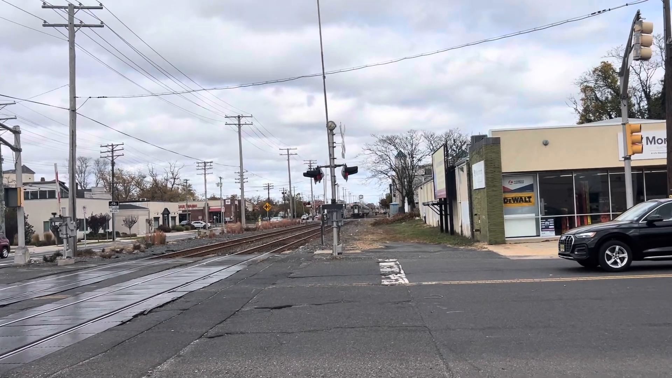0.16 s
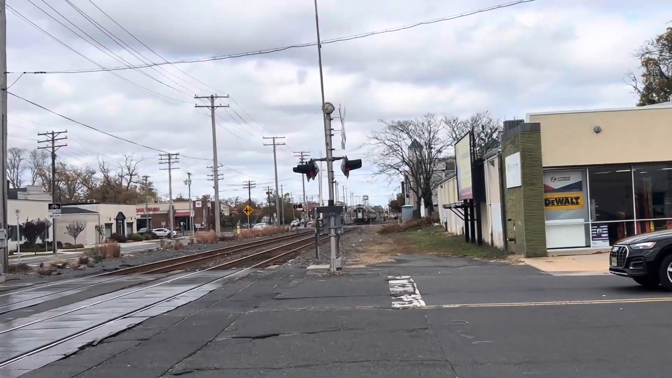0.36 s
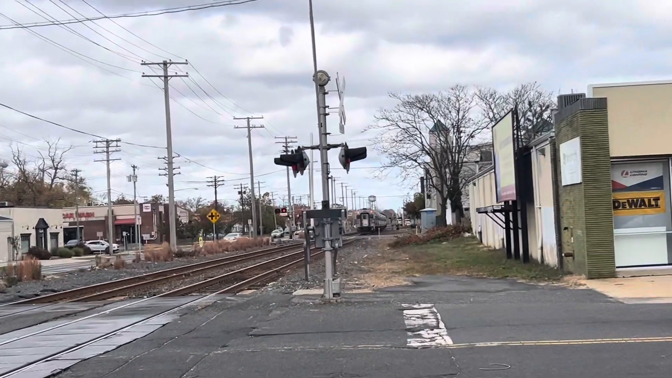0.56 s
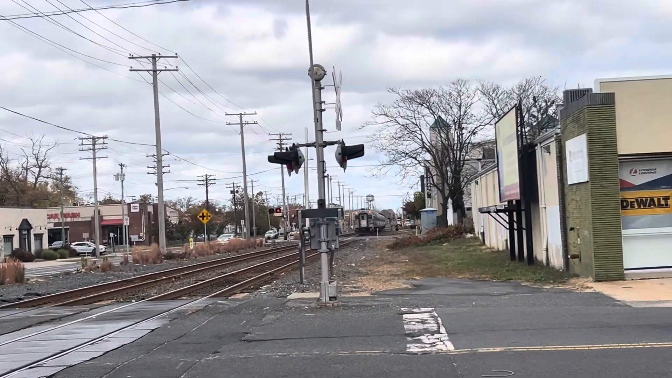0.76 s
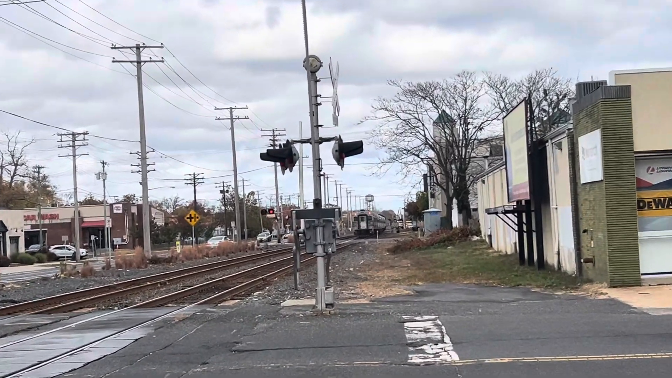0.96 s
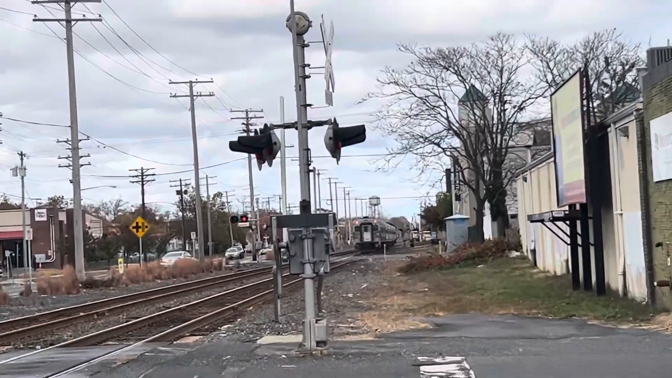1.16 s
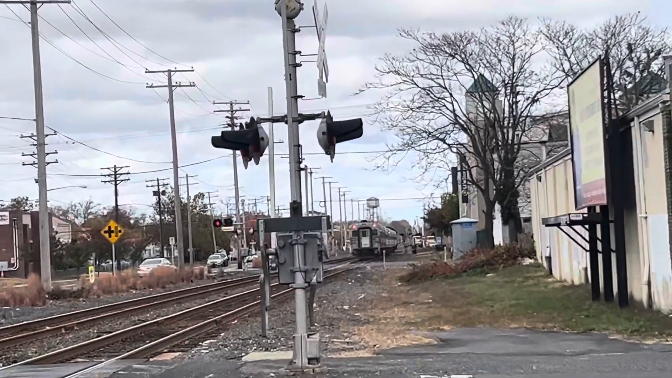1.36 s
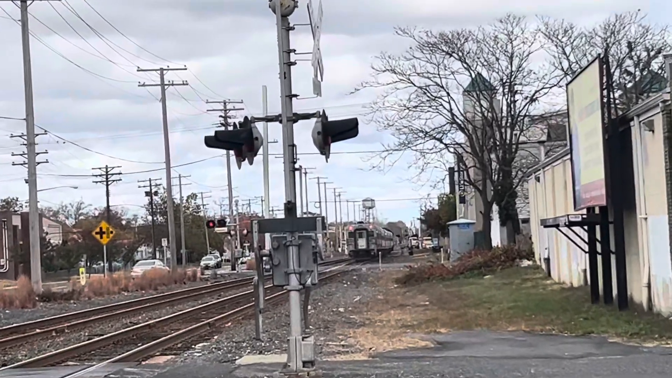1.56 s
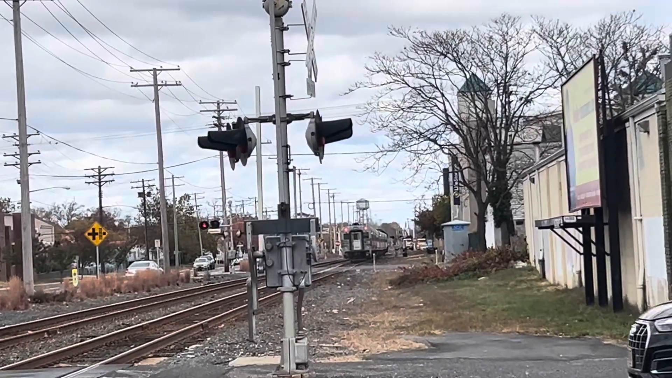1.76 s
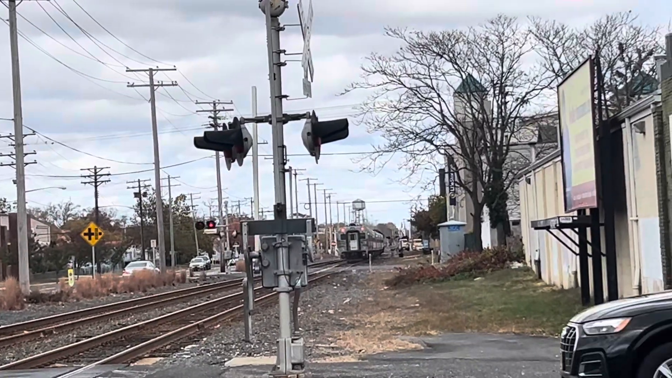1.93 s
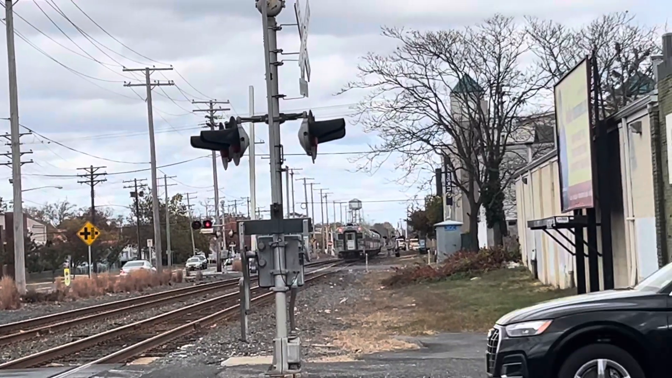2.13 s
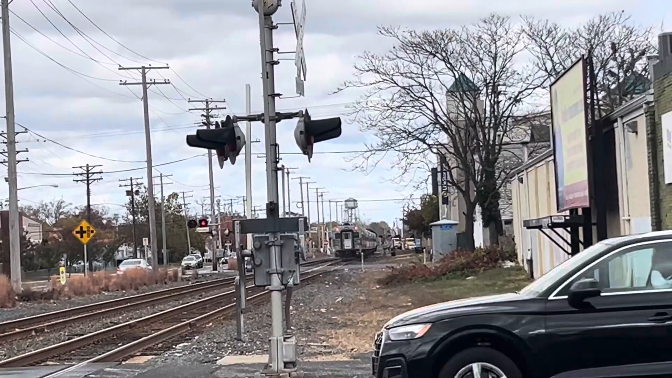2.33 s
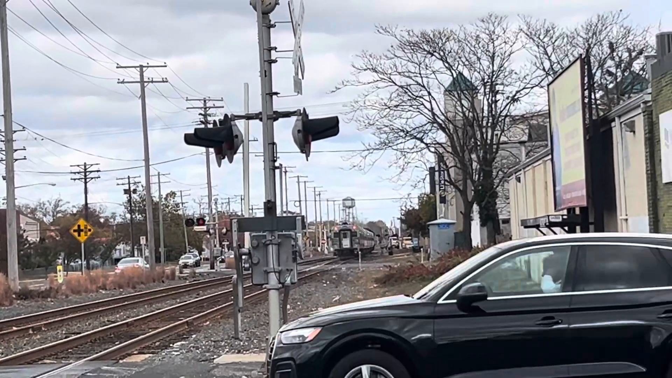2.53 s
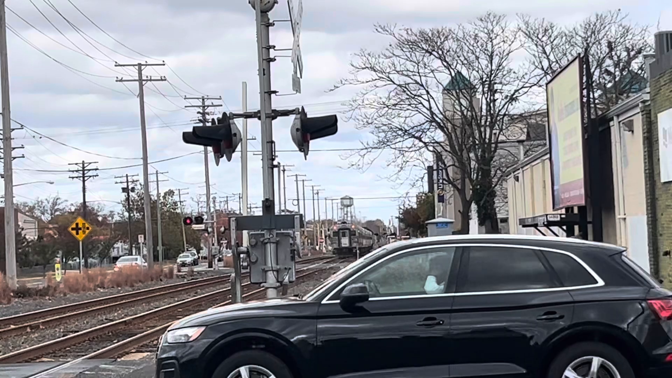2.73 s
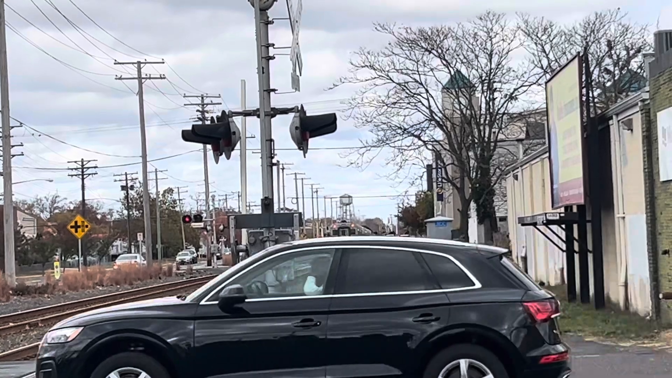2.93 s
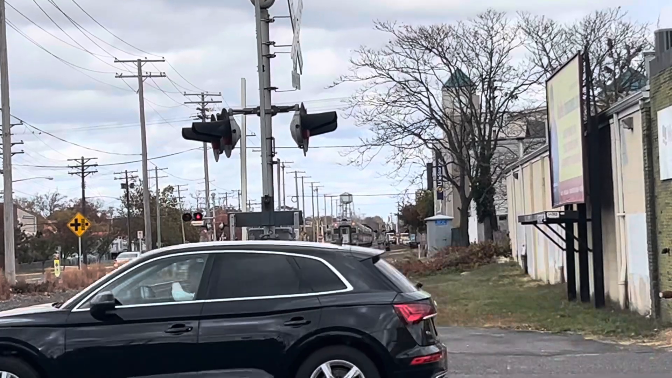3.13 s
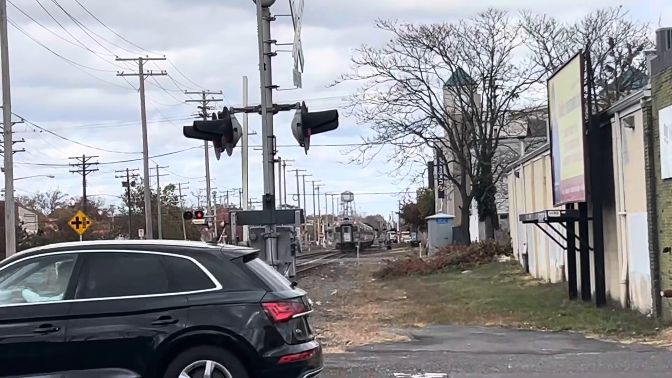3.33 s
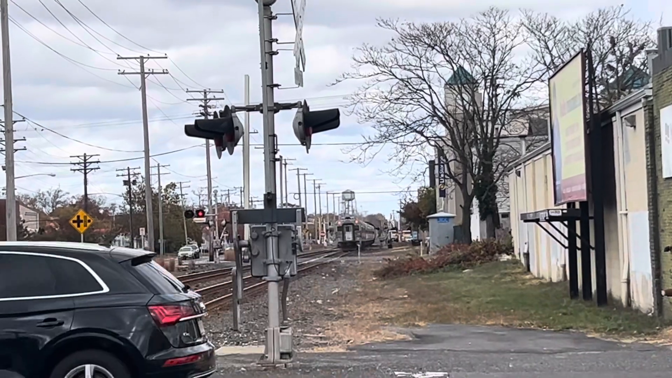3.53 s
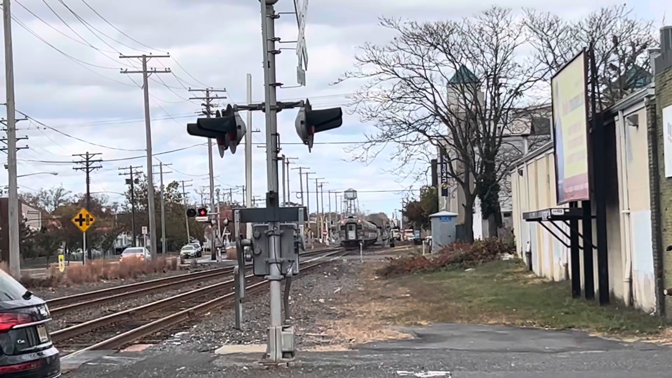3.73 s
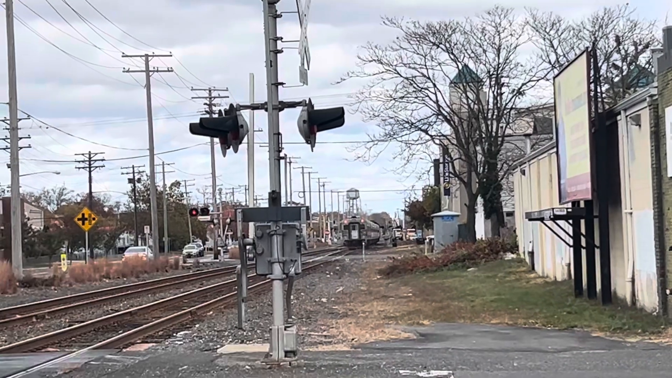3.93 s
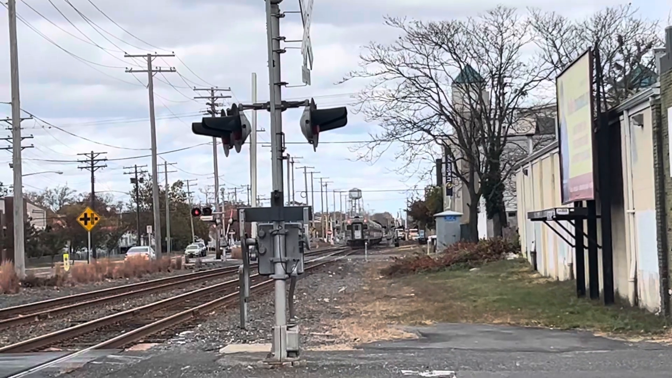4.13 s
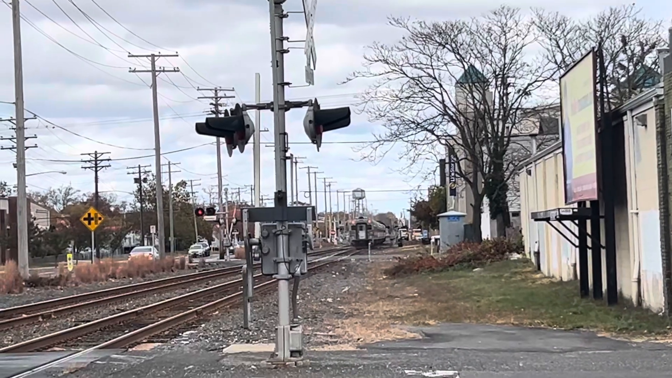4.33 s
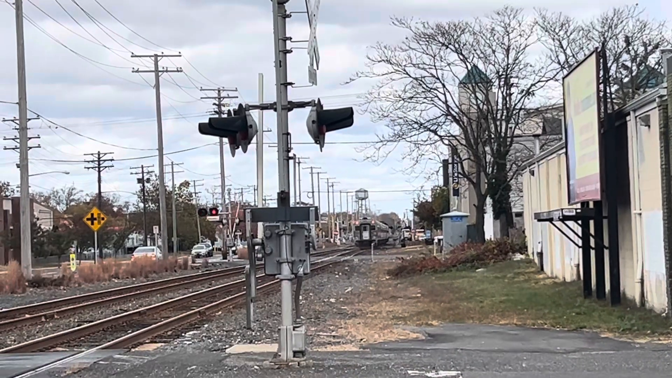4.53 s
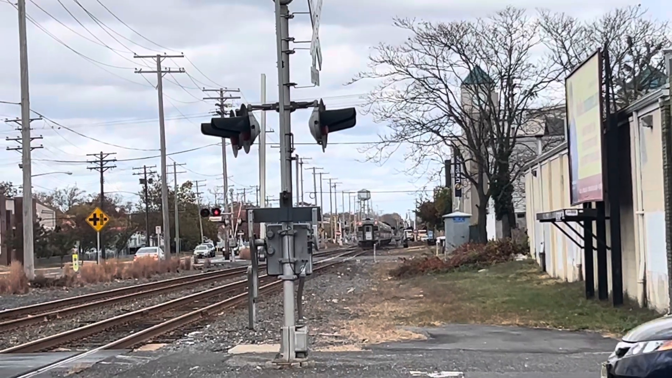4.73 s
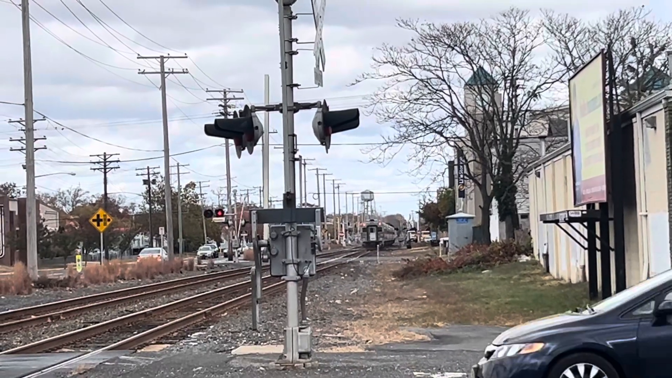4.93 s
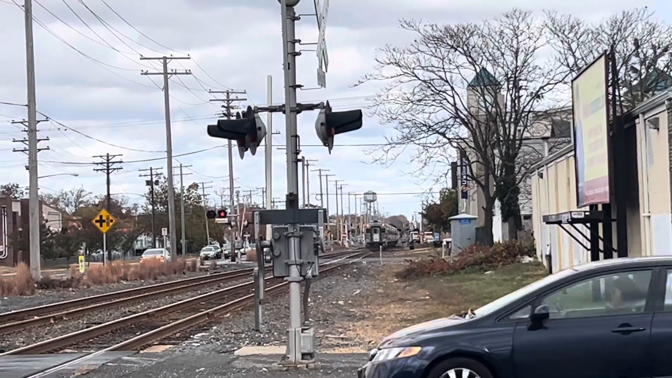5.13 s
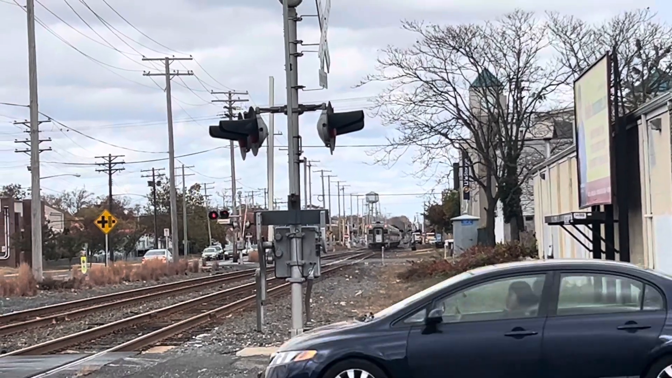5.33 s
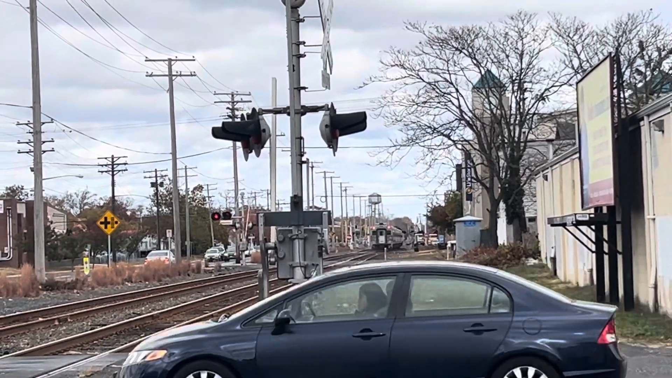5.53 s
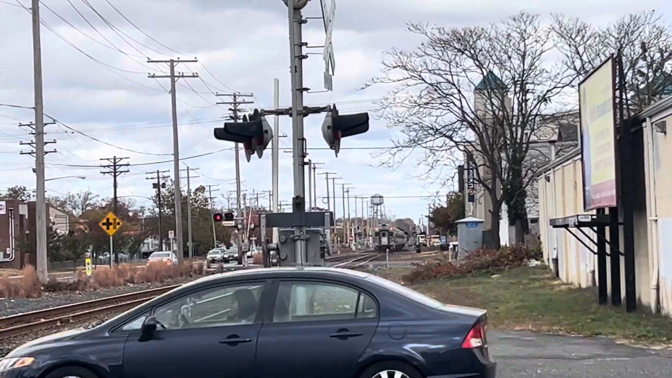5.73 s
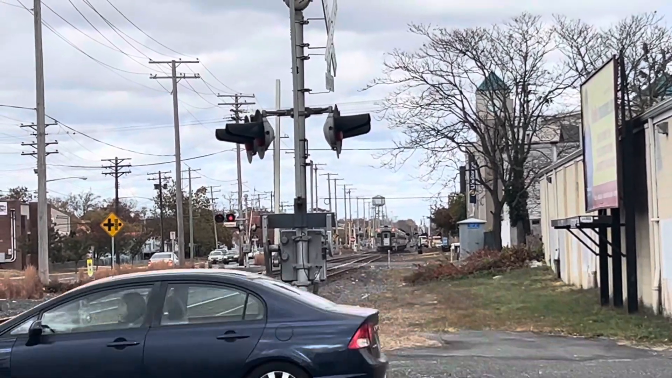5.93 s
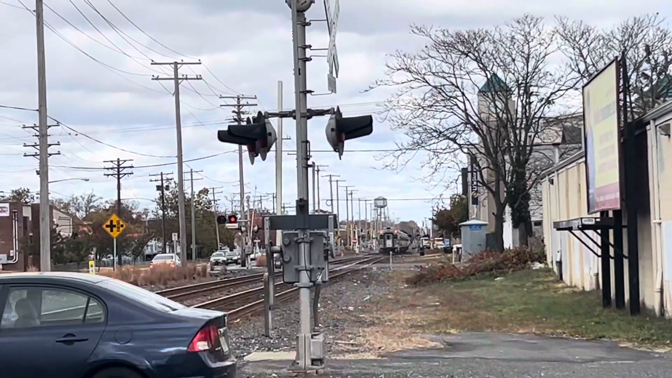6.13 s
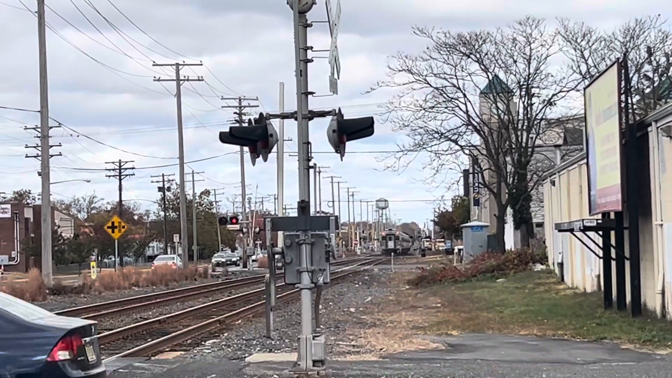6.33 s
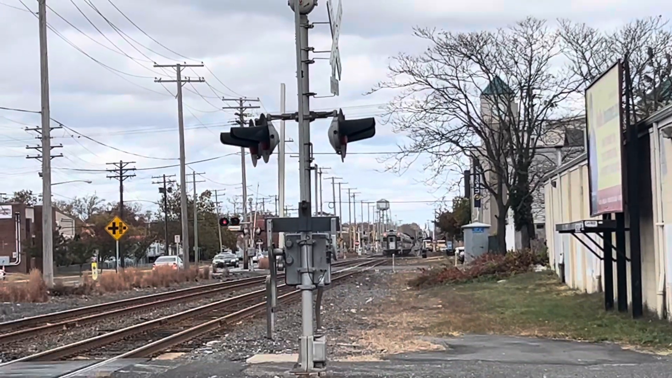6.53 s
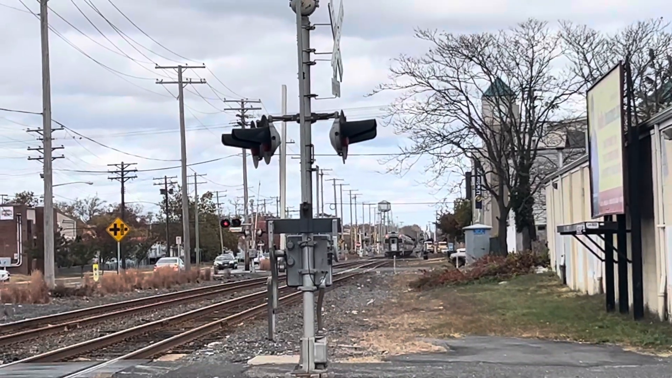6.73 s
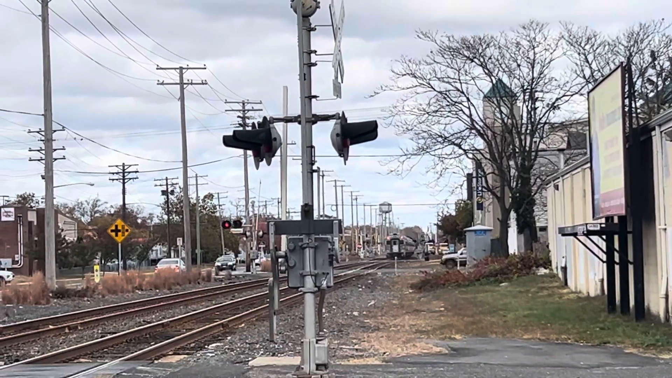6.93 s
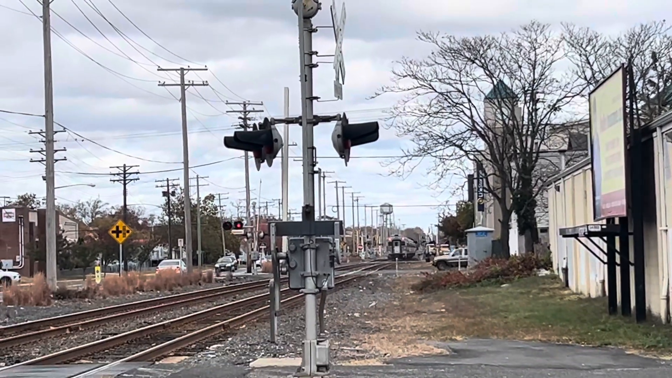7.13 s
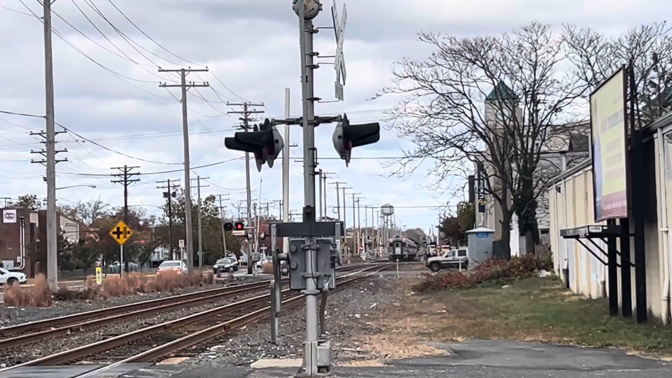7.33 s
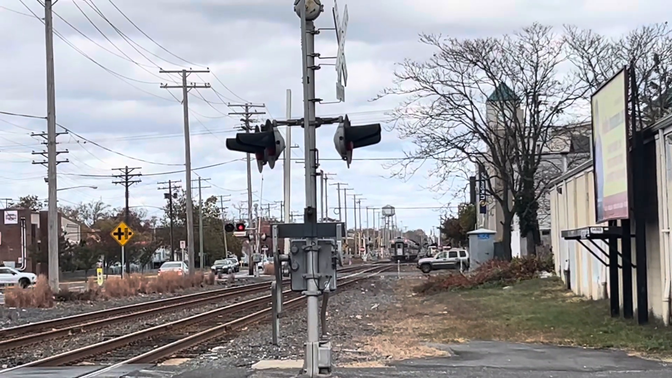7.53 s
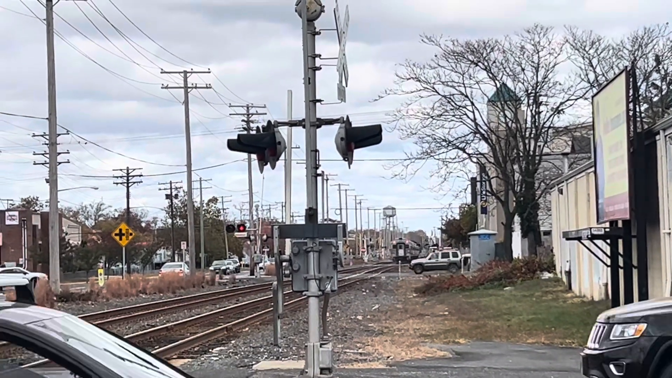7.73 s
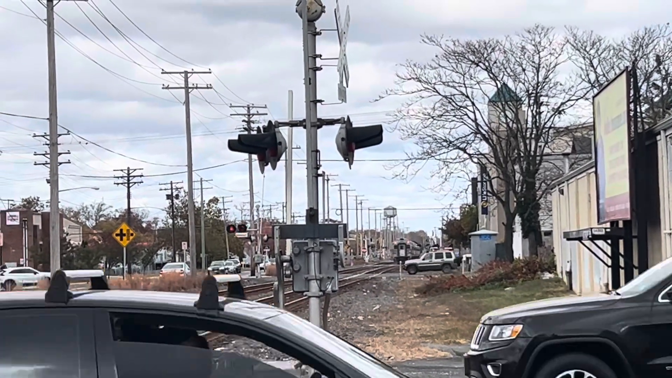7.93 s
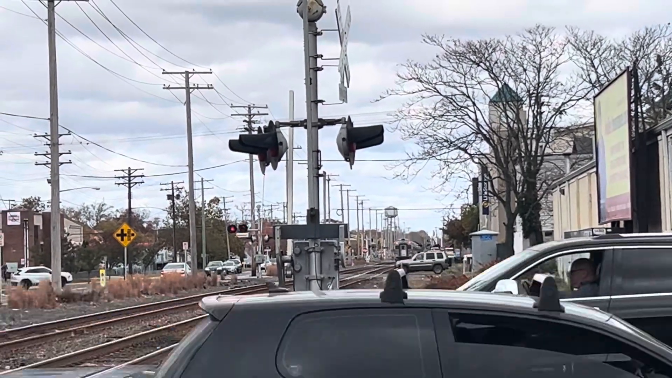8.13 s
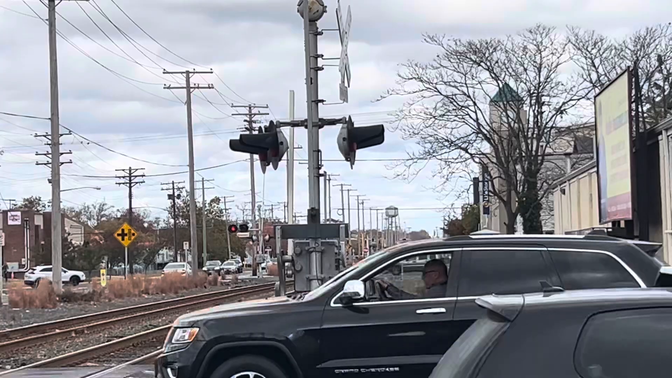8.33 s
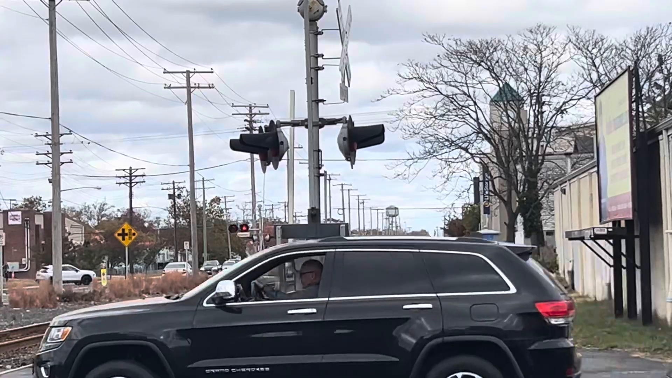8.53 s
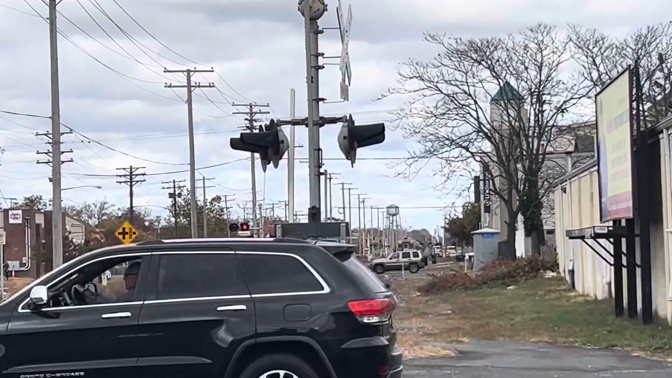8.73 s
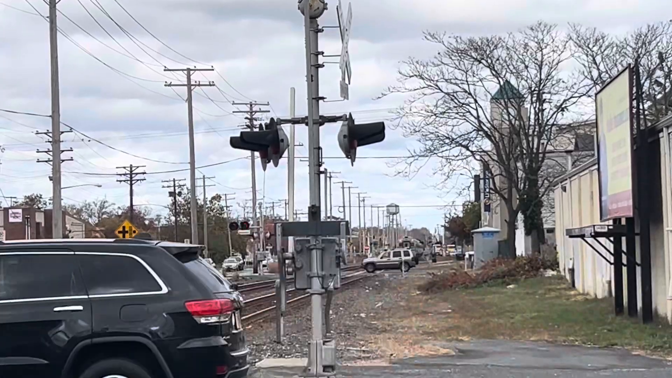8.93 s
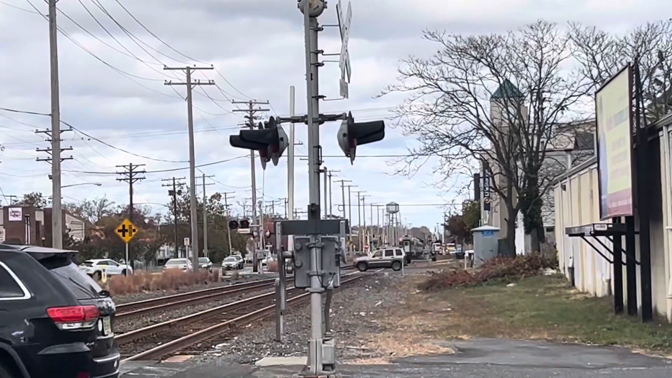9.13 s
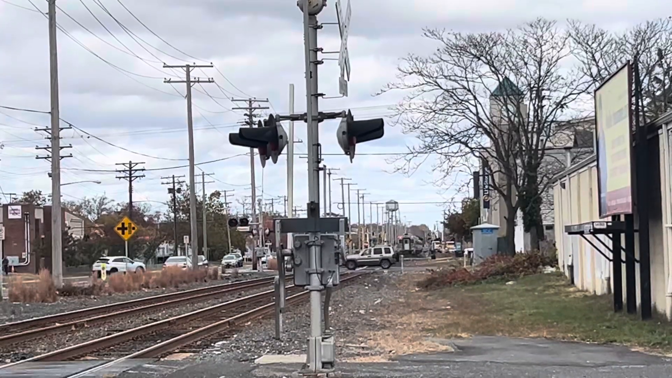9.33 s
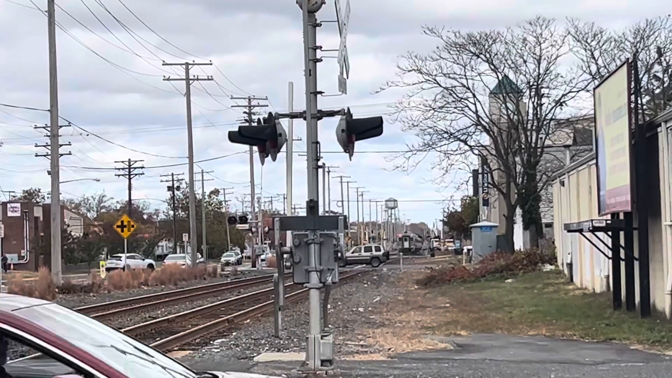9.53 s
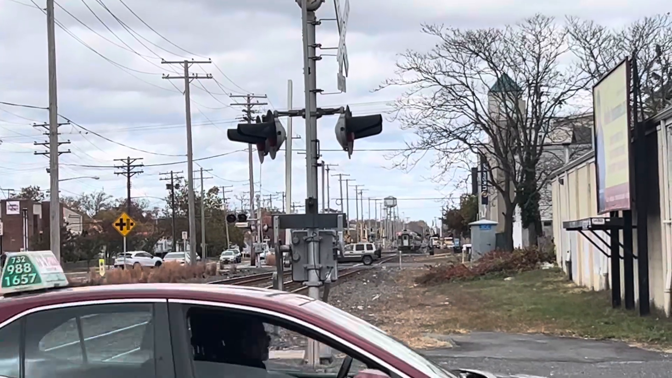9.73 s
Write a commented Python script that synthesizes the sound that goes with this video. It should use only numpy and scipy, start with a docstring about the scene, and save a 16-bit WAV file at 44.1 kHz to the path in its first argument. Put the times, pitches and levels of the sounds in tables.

```python
"""At a railway crossing, cars roll slowly past, close by: shaped noise for their bodies, tyres and fine grit.
Tyres striking rails and joints are decaying noise and struck modes; stones are short filtered noise bursts.
One engine pulls away, one eases off and a deeper one drones past, each a sum of harmonics of a gliding rate.
A fan hisses as band noise, short squeaks and a bird are gliding sines, and a high hiss puffs once. Far off
a departing train rumbles as shaped noise, while its wheels sing as wandering tones in narrow noise."""
import sys
import numpy as np
from scipy import signal
from scipy.fft import rfft, irfft
from scipy.io import wavfile

SR = 44100
rng = np.random.default_rng(int(sys.argv[2]) if len(sys.argv) > 2 else 0)


def inscribe(sig):
    """Save sig as 16-bit PCM at rate SR to the path in sys.argv[1].

    A 1-D sig is mono; a 2-D sig holds one channel per row.
    Samples are clipped to [-1, 1] before scaling.
    """
    pcm = np.round(np.clip(np.atleast_2d(sig).T, -1, 1) * 32767)
    wavfile.write(sys.argv[1], SR, pcm.astype(np.int16))


N = 434826
T = np.arange(N) / SR   # t/s
HZ = np.maximum(np.fft.rfftfreq(N, 1 / SR), 1)   # f/Hz

# Spectra of the rolling noise, normalised to unit power in use: columns f/Hz, relative level/dB (per Hz).
# Booming car bodies, roaring road, ringing tread, hissing tread, fine sizzle:
BOOM = [(20, -37), (32, -4), (45, 12), (60, 17.5), (85, 16), (120, 7.5), (170, 1.5), (260, -9.5),
        (500, -71)]
ROAR = [(70, 3.5), (140, 7), (220, 6.5), (320, 3.5), (430, -1), (560, -4.5), (850, -4), (1000, -7),
        (1250, -19), (1700, -27), (3000, -91)]
TREAD_RING = [(700, -9), (1100, 0), (1450, 5), (1620, 4), (1780, 7.5), (2020, 7), (2300, -9.5),
              (3200, -49.5)]
HISS = [(1200, -24.5), (2200, 9), (2800, 7), (4000, 0), (5200, -2), (6500, -12), (8700, -17.5),
        (12000, -99)]
SIZZLE = [(2500, -20), (4000, -4), (5500, 1), (8200, -3.5), (9500, -13), (12000, -10.5), (14200, -11.5),
          (15000, -18)]
# Tyres growling on the panels, and a car's fan hissing around 5 kHz: columns f/Hz, relative level/dB
GROWL = [(200, -23.5), (300, 4.5), (350, 9.5), (470, -4.5), (600, -5), (900, -44)]
FAN = [(3500, -18.5), (4800, 3), (5600, 4), (6500, -0.5), (8000, -31.5)]
# Tread slap, carcass thud, loose panel's rattle, crushed gravel: columns f/Hz, relative level/dB
SLAP = [(200, -25), (400, 21), (850, 13), (1250, -23), (1850, -6), (2500, -13), (5000, -31), (10000, -61)]
THUD = [(40, -29.5), (100, -18), (230, 3.5), (350, 4.5), (600, -23), (1500, -63)]
RATTLE = [(1100, -27.5), (1650, 0), (1850, 3.5), (2050, 0), (2400, -18.5), (4000, -23.5)]
GRAVEL = [(900, -11), (1700, -3), (2800, 2), (3900, 1.5), (4800, -4), (7000, -30.5)]
# The puff of high hiss and the train's rumble: columns f/Hz, relative level/dB
PUFF = [(5000, -25), (8000, 7), (11000, -6), (15000, -3)]
TRAIN = [(35, -11), (58, 22.5), (110, 8.5), (180, 7.5), (260, -0.5), (340, -1), (450, -7.5), (800, -2.5),
         (950, -25), (1100, -4.5), (1400, -6), (1650, -56)]

# Cars rolling past: columns t/s when closest, reach/s, then relative level/dB of roar, tread hiss, sizzle
PASSES = [(.2, 0.2, -44.5, -71, -88), (3.35, 1, -45.5, -47, -63.5), (4.47, 0.6, -35, -46.5, -60.5),
          (7.45, 0.99, -34.5, -43, -53.5), (8.82, 0.77, -35.5, -43.5, -52.5),
          (9.88, 0.5, -32.5, -47.5, -53.5)]
FAR_ROAR_DB, FAR_HISS_DB, FAR_SIZZLE_DB = -38, -51.5, -99   # traffic further down the street
FALLOFF = 1.584   # power falls as (1 + (time from closest / reach)^2) to this exponent
# Car bodies heaving over the crossing: columns t/s when loudest, reach/s, relative level/dB
HEAVES = [(1.5, 0.47, -29), (3.22, 0.15, -21), (4.45, 0.36, -29), (7.62, 0.59, -20.5), (8.4, 0.36, -21),
          (9.75, 0.11, -23)]
FAR_BOOM_DB = -45.5   # on the same relative scale as HEAVES
LUMP_DB, LUMPS_HZ = 1.7, 16   # depth in the roar, and rate, of the road's unevenness
# Tyres growling on the panels: columns t/s when loudest, reach/s, level/dB
GROWLS = [(.2, 0.45, -38), (3.75, 0.14, -40), (6.5, 0.53, -36), (8.8, 0.32, -34)]
# A car's fan swelling and receding once, one row: t/s when loudest, reach/s, level/dB
FAN_PASS = (7.96, 0.5, -52.5)

# Tyres meeting a rail or joint: columns t/s, thud level/dB, knock level/dB (both relative),
# knock's strongest f/Hz, panel rattle level/dB
BUMPS = [(.04, -31, -23, 680, -40), (.125, -30, -22, 620, -44), (.155, -32, -24, 680, -42),
         (.215, -31, -23, 600, -48), (.295, -30, -23.5, 680, -44), (.385, -35, -26, 650, -42),
         (3.886, -24, -22, 800, -42), (3.92, -23, -29, 450, -50), (4.07, -27, -20, 900, -29),
         (4.122, -25, -27, 800, -40), (4.142, -23, -20, 520, -36), (4.268, -23, -25, 560, -40),
         (4.431, -28, -20, 780, -34), (4.472, -25, -23, 450, -28), (4.505, -25, -33, 450, -36),
         (4.54, -28, -19.5, 800, -46), (4.562, -24, -22, 680, -50), (4.595, -23, -27, 600, -50),
         (4.635, -24, -25, 430, -44), (4.668, -25, -25, 800, -38), (4.70, -25, -27, 430, -50),
         (4.75, -24, -29, 450, -46), (6.095, -23, -36, 450, -50), (6.333, -24, -27, 500, -50),
         (6.438, -22, -31, 450, -50), (6.647, -24, -27, 500, -35), (6.728, -26, -25, 600, -32),
         (6.773, -24, -24, 450, -40), (6.793, -26, -18, 680, -38), (7.146, -26, -27, 600, -33),
         (8.022, -18, -20, 700, -27), (8.261, -23, -29, 600, -46), (8.495, -19, -25, 450, -46),
         (8.668, -20, -19, 500, -40), (8.826, -22, -27, 450, -44), (8.945, -20, -23, 450, -32),
         (9.012, -23, -21, 900, -33), (9.104, -16, -19, 470, -28), (9.181, -26, -19, 570, -42),
         (9.256, -25, -26, 430, -38), (9.275, -20, -18, 500, -34), (9.295, -24, -23, 520, -40),
         (9.387, -25, -19, 550, -37), (9.445, -22, -24, 500, -36), (9.463, -24, -19, 750, -29),
         (9.521, -30, -19, 650, -48), (9.595, -35, -26, 700, -48), (9.741, -36, -23, 750, -44),
         (9.762, -38, -24, 800, -44), (9.79, -36, -18.5, 880, -31), (9.815, -38, -23, 900, -35)]
# Modes of the struck tyre and crossing panel: columns f/Hz, relative level/dB, t60/s
KNOCK = [(350, -7, 0.075), (440, 5.5, 0.054), (580, -0.5, 0.085), (683, -0.5, 0.071), (838, 0, 0.064),
         (1040, -0.5, 0.045)]
KNOCK_SPREAD_OCTAVES, KNOCK_GAIN_DB, SLAP_GAIN_DB, THUD_GAIN_DB = .75, -8, -13, 1.5
MODE_SCATTER_DB = 2.5   # chance in the strength of every struck mode
# Lesser pavement seams, as often as this with a car at its closest; levels on the scale of BUMPS
SEAMS_PER_S, SEAM_KNOCK_DB, SEAM_THUD_DB, SEAM_HZ = 7, -31, -30, 550
# Tyres scrunching over loose gravel: columns t/s when loudest, reach/s, level/dB
SCRUNCHES = [(.48, .14, -56.5), (8.91, .02, -40), (8.995, 0.037, -36.5), (9.45, 0.02, -40.5)]
GRAVEL_GRAINS_PER_S, GRAVEL_GRAIN_S = 1600, .0012   # rate, and decay constant of the power
# Loudest stones and loose parts clicking: columns t/s, relative level/dB, f/Hz, t60/s
CLICKS = [(.042, -37, 2600, .05), (.298, -41, 4400, .15), (.397, -35, 3400, .11), (.455, -43, 3500, .04),
          (.562, -37, 2600, .06), (.98, -41, 3600, .04), (1.233, -39, 4400, .16), (1.388, -38, 2700, .04),
          (1.49, -39, 2800, .04), (2.32, -40, 4200, .03), (3.704, -35, 3000, .025), (4.472, -33, 2800, .1),
          (6.601, -31, 2800, .02), (6.648, -32, 3200, .025), (6.668, -32, 3200, .025),
          (6.729, -27, 1900, .06), (6.772, -30, 3400, .02), (7.191, -27.5, 3500, .02),
          (7.211, -30, 3000, .02), (7.435, -31, 4400, .03), (7.624, -24, 4800, .07),
          (8.023, -26, 3100, .11), (8.657, -24, 2900, .04), (8.666, -29, 2900, .03),
          (9.103, -19.5, 3800, .019), (9.136, -28, 3300, .04), (9.281, -29, 3000, .02),
          (9.67, -31, 3000, .03), (9.79, -25, 2000, .1)]
STONES_PER_S, STONE_DB, STONE_T60_S = 11, -39, .025   # smaller stones; rate with a car at its closest
CRACK_DB, CRACK_FULL_DB, CRACK_T60_S = -5, -19, .014   # dry edge; snaps below the full level are duller
CRACK_LOW_HZ, CRACK_HIGH_HZ = 600, 5800   # lower edge, and limit of the upper edge
# A small metal part chinking: columns t/s, relative level/dB
CHINKS = [(7.624, -31), (7.626, -24.5), (7.632, -34), (7.639, -38)]
# Its modes: columns f/Hz, relative level/dB, t60/s
METAL = [(2070, -9, .03), (3100, -8, .015), (3770, -12, .02), (4600, -5, .016), (5200, -7, .016),
         (6050, -9, .05), (6300, -6, .014), (7150, -19, .015), (8300, -18, .02)]

# Engine pulling away: columns t/s, crank f/Hz, second-order level/dB, third-order level/dB
PULLING = [(2.0, 42.8, -48, -41), (2.29, 50, -42, -32), (2.45, 52, -40, -35), (2.72, 57.7, -30, -36),
           (2.87, 62, -33, -42), (3.08, 68.3, -23.5, -44), (3.33, 77.5, -19, -50), (3.5, 83, -23, -50),
           (3.65, 86.6, -27, -48), (3.85, 91, -30.5, -48), (4.1, 94, -35, -48), (4.2, 95, -42, -55)]
# Its first order, one row: t/s when loudest, reach/s, level/dB
PULLING_THROB = (3.22, 0.28, -25)
# Engine easing off: columns t/s, crank f/Hz
EASING_SPEED = [(4.55, 89.7), (4.92, 83.5), (5.08, 82.4), (5.35, 65.4)]
# Its exhaust's pass, one row: t/s when closest, reach/s, level/dB
EASING_PASS = (4.98, 0.23, -22)
# Its exhaust overtones: columns order, level/dB relative to the pass
EASING_ORDERS = [(1, -12.5), (2, -7), (4, -19)]
# Deep engine, slowing for the rails and picking up again: columns t/s, firing f/Hz
DRONE_SPEED = [(5.4, 62.34), (5.8, 60.57), (6.2, 60.72), (6.6, 58.94), (6.95, 58.58), (7.7, 56.9),
               (8.1, 57.97), (8.85, 60.36), (9.6, 63.22)]
# Its orders, each swelling once or twice: columns order, t/s when loudest, reach/s, level/dB
DRONE_ORDERS = [(1, 9.06, 0.7, -21.5), (2, 8.53, 0.63, -19.5), (3, 6.76, 0.77, -31.5),
                (3, 8.4, 0.58, -29.5), (4, 7.94, 0.48, -25.5), (4, 9.2, 0.53, -31), (5, 6.16, 0.28, -33.5),
                (5, 7.67, 1.03, -29), (6, 8.2, 0.76, -39), (11, 7.2, .4, -55)]
DRONE_FAR_DB, PIPE_FAR_DB = -36.5, -52.5   # orders 1 and 2, and each upper one, with the car far off
WAVER_DB = 2.4   # spread of the upper orders' level
ENGINE_ROUGH, ENGINE_FADE_S = .1, .2   # relative unevenness of each order; fade in and out
PULLING_LEFT_DB, EASING_LEFT_DB, DRONE_LEFT_DB, PIPE_LEFT_DB = 4, 5.5, 2.5, 4   # left minus right
DIP_AT_S, DIP_HALF_WIDTH_S, DIP_DB = 3.215, .035, -17   # the rising hum and the boom dip briefly

# Thin high squeaks: columns t/s, length/s, start f/Hz, end f/Hz, level/dB, rasp (0-1)
SQUEAKS = [(0., .22, 14600, 13900, -73, 0.2), (.2, 0.18, 14000, 14250, -65, .1),
           (4.32, .06, 14600, 14400, -61, 0.7), (4.722, .07, 14450, 14500, -55, .6),
           (5.112, 0.05, 14600, 14350, -53, 1.), (5.462, 0.042, 14650, 14500, -47, 1.)]
# Creaks and squeaks of the passing cars: columns t/s, length/s, start f/Hz, end f/Hz, level/dB, rasp (0-1)
CREAKS = [(1.225, 0.027, 2450, 2450, -45, 0.9), (1.26, 0.03, 2330, 2330, -45, 1),
          (1.24, 0.05, 4400, 4520, -56, .6), (7.825, 0.036, 2030, 2040, -33.5, 0.55),
          (8.11, 0.073, 1400, 1660, -41, 0.4), (8.15, .04, 3550, 3570, -45, 0.8),
          (8.61, 0.0316, 2000, 1980, -35, 0.4), (8.61, 0.051, 4065, 3910, -45, 0.41),
          (8.79, 0.039, 3900, 4047, -46, 0.7)]
PUFF_AT_S, PUFF_DB, PUFF_RISE_S, PUFF_T60_S = 4.36, -56, .015, 1.8

# The departing train's rumble: columns t/s, level/dB
LEAVING = [(0, -27.5), (.2, -34.5), (.5, -29.5), (1, -41.5), (1.5, -34.5), (1.9, -29.5), (2.4, -32.5),
           (4, -44), (6, -36.5)]
# Its wheels singing in swells: columns t/s, reach/s, low-tone and high-tone relative level/dB
SINGING = [(.06, 0.032, -58, -42), (.42, 0.29, -54, -46), (1.58, .13, -45, -49), (1.86, 0.08, -41, -45),
           (1.94, .04, -52, -38), (2.16, .11, -56.5, -39.5), (2.35, .05, -59.5, -44.5), (2.9, 1, -61, -50)]
SING_WANDER, SING_RASP = .009, 1.1   # relative pitch wander; noise against tone
# Bird calls: columns t/s, length/s, start f/Hz, end f/Hz, level/dB, rasp (0-1)
BIRD = [(.09, .13, 7250, 6500, -61, 1.), (1.11, .05, 8500, 8200, -60, .8), (1.14, .15, 7400, 6500, -59, 1.),
        (2.05, .09, 5700, 6700, -55, .1), (2.2, .13, 7300, 6300, -58, 1.)]

# Stereo width: columns f/Hz, side minus mid level/dB (before a common trim)
WIDTH = [(60, -19), (110, -11), (200, -11.5), (380, -11), (700, -7), (1200, -3.5), (1400, -3), (1500, 9.5),
         (1600, -0.5), (1680, -8.5), (2380, -9.5), (4400, -35), (6500, -9), (9500, 8), (15000, -3.5)]
# Stereo lean: columns f/Hz, left minus right level/dB
LEAN = [(60, 0), (270, 2), (500, 2.5), (700, 0), (950, 2), (1200, -1), (1600, -3.5), (2100, -1),
        (2700, -0.5)]
CUTOFF_HZ = 15200


def road(roar_db, hiss_db, near_db):
    """Rolling noise: bodies boom, rough asphalt makes tyres roar, and the tread rings and hisses over grit."""
    boom_db = swell(HEAVES, FAR_BOOM_DB) + dip_db()
    texture = drift(LUMPS_HZ)   # unevenness of the road, shared by roar, tread and hiss
    grit_per_s = 200 * from_db(near_db + 55)
    grit = (rng.random(N) < grit_per_s / SR) * rng.random(N)
    boom = street(BOOM, from_db(boom_db + 1.5 + 0.76 * drift(1.6)))
    roar = street(ROAR, from_db(roar_db + 5.0 + LUMP_DB * texture))
    tread_db = (roar_db + hiss_db) / 2 - 3.0
    tread = street(TREAD_RING, from_db(tread_db + 0.63 * texture))
    hiss_gain = from_db(hiss_db - 2.04 + 0.85 * texture + 0.53 * drift(26))
    hiss = street(HISS, hiss_gain * (1 + 4 * grit))
    sizzle_gain = from_db(near_db - 1.5 + 1.3 * drift(6.0))
    sizzle = street(SIZZLE, sizzle_gain * (1 + 4 * grit))
    return boom + roar + tread + hiss + sizzle


def growl():
    """Amplitude-modulated band noise: tyres growl on the crossing panels with a fast uneven level."""
    return street(GROWL, from_db(swell(GROWLS) + 2.7 * drift(22)))


def fan():
    """Level against distance: a car's fan hisses as band noise around 5 kHz, swelling and receding once."""
    return street(FAN, from_db(swell([FAN_PASS])))


def bumps(near_db, slap_t60, thud_t60, rattle_t60):
    """Impact excitation: an edge knocks modes, slaps the tread, thuds the carcass and rattles the panel."""
    seam_times = chance_times(SEAMS_PER_S, near_db)
    seams = [(s, SEAM_THUD_DB, SEAM_KNOCK_DB, SEAM_HZ, -np.inf) for s in seam_times]   # no rattle
    s, thud_db, knock_db, knock_hz, rattle_db = np.transpose(list(BUMPS) + seams)
    slap = street(SLAP, decays(s, knock_db + SLAP_GAIN_DB, slap_t60, rise=0.00096))
    thud = street(THUD, decays(s, thud_db + THUD_GAIN_DB, thud_t60, rise=0.0032))
    rattle = street(RATTLE, decays(s, rattle_db, rattle_t60, rise=0.0015))
    knocks = list(zip(s, knock_db + KNOCK_GAIN_DB, knock_hz))
    mid, side = (rfft(strike(knocks, KNOCK, detune=0.034)) for _ in range(2))
    return slap + thud + rattle + spread(mid, side)


def gravel():
    """Granular noise: dense random grains of uneven power, each decaying, as a tyre crushes gravel."""
    grains = (rng.random(N) < GRAVEL_GRAINS_PER_S / SR) * rng.exponential(1, N)
    power = signal.lfilter([1], [1, -np.exp(-1 / (GRAVEL_GRAIN_S * SR))], grains)
    return street(GRAVEL, from_db(swell(SCRUNCHES)) * rms_one(np.sqrt(power)))


def clicks(near_db):
    """Damped resonance of noise: each snapping stone has its own pitch band and a short dry crack."""
    out = np.zeros(N)
    stones = [(s, STONE_DB + rng.normal(0, 2.5), rng.uniform(1802, 3366), STONE_T60_S)
              for s in chance_times(STONES_PER_S, near_db)]
    for s, db, hz, t60 in list(CLICKS) + stones:
        start = int(s * SR)
        age = T[:min(SR // 4, N - start)]
        band_hz = [hz * 0.7, min(hz * 1.33, SR / 3)]
        band = signal.butter(1, band_hz, "band", fs=SR, output="sos")
        edge_hz = [CRACK_LOW_HZ, min(hz * 1.35, CRACK_HIGH_HZ)]
        edge = signal.butter(2, edge_hz, "band", fs=SR, output="sos")
        ringing, cracking = rng.standard_normal((2, len(age)))
        ringing = rms_one(signal.sosfilt(np.vstack([band, band, band]), ringing))
        cracking = rms_one(signal.sosfilt(np.vstack([edge, edge]), cracking))
        snap = ringing * from_db(-6.5 - 60 * age / t60)
        crack_db = CRACK_DB + (db - CRACK_FULL_DB) / 2   # against the snap
        crack = cracking * from_db(crack_db - 60 * age / CRACK_T60_S)
        out[start:start + len(age)] += from_db(db) * (snap + crack)
    return out


def chinks():
    """Modal ringing: each blow sets the damped modes of a small metal part sounding."""
    return strike(CHINKS, METAL, detune=0.0025)


def engines():
    """Harmonic series of the exhausts: three engines sound in turn, a little to the left."""
    _, second_db, third_db = in_time(PULLING)
    pulling_dbs = [swell([PULLING_THROB]), second_db, third_db]
    pulling_orders = [(k, db + dip_db()) for k, db in enumerate(pulling_dbs, 1)]
    pulling = engine(PULLING, pulling_orders, ENGINE_ROUGH, wobble=0.001)

    pass_db = swell([EASING_PASS])
    easing_orders = [(k, pass_db + db) for k, db in EASING_ORDERS]
    easing = engine(EASING_SPEED, easing_orders, ENGINE_ROUGH, wobble=0.0038)

    multiples = sorted({row[0] for row in DRONE_ORDERS})
    lower = [(k, order_db(k, DRONE_FAR_DB)) for k in multiples if k <= 2]
    upper = [(k, order_db(k, PIPE_FAR_DB) + WAVER_DB * drift(10.4)) for k in multiples if k > 2]
    drone = engine(DRONE_SPEED, lower, ENGINE_ROUGH, wobble=0.0022, stays=True)
    pipe = engine(DRONE_SPEED, upper, ENGINE_ROUGH, wobble=0.0022, stays=True)
    return (pan(pulling, PULLING_LEFT_DB) + pan(easing, EASING_LEFT_DB)
            + pan(drone, DRONE_LEFT_DB) + pan(pipe, PIPE_LEFT_DB))


def engine(speed, orders, rough, wobble, stays=False):
    """Fourier synthesis: near-aligned orders (multiple, level/dB) form pulses; uneven firing shakes each."""
    speed_hz = in_time(speed)[0] * (1 + wobble * drift(9.2))
    turn = 2 * np.pi * np.cumsum(speed_hz) / SR
    end = np.inf if stays else speed[-1][0]
    heard = np.clip(np.minimum(T - speed[0][0], end - T) / ENGINE_FADE_S + 1, 0, 1)
    lines = np.zeros(N)
    for k, db in orders:
        line = np.cos(k * turn + rng.normal(0, 0.67))
        lines += from_db(db) * line * (1 + rough * drift(0.85))
    return -np.sqrt(2) * heard * lines


def order_db(order, far_db):
    """Superposition of powers: one order of the deep engine sums its swells over a far level."""
    return swell([passing for k, *passing in DRONE_ORDERS if k == order], far_db)


def squeaks():
    """Frequency modulation: thin squeaks and the cars' creaks are gliding tones roughened by flutter."""
    return whistles(SQUEAKS, rasp_hz=200) + whistles(CREAKS, rasp_hz=200)


def puff():
    """Exponential decay: a high hiss rises quickly and dies away."""
    age = np.maximum(T - PUFF_AT_S, 0)
    decay = from_db(PUFF_DB - 60 * age / PUFF_T60_S)
    return street(PUFF, decay * (1 - np.exp(-age / PUFF_RISE_S)))


def train():
    """Friction-driven resonance: the train rumbles off while its wheels sing wavering tones on the rails."""
    low_db, high_db = swells(SINGING, [-np.inf, -np.inf])
    low = from_db(low_db + 2.0) * narrow(868, 23)
    high_tones = narrow(1473, 25) + from_db(-12.0) * narrow(2004, 20)
    high = from_db(high_db - 1.5) * high_tones
    rumble = street(TRAIN, from_db(in_time(LEAVING)[0]))
    return low + high + rumble


def narrow(hz, width_hz):
    """Resonance kept ringing by friction: a wandering tone in a skirt of narrow noise, at unit power."""
    wander_hz = hz * (1 + SING_WANDER * drift(20.7))
    tone = np.sqrt(2) * np.sin(2 * np.pi * np.cumsum(wander_hz) / SR)
    shape = 1 / (1 + ((HZ - hz) / width_hz) ** 2)
    skirt = rms_one(irfft(rfft(rng.standard_normal(N)) * shape, N))
    return rms_one(tone + SING_RASP * skirt)


def bird():
    """Frequency modulation: short gliding calls, most made raspy by a fast flutter of pitch."""
    return whistles(BIRD, rasp_hz=387)


def whistles(rows, rasp_hz):
    """Frequency modulation: short gliding tones turn raspy where a fast flutter shakes their pitch."""
    out, flutter = np.zeros(N), drift(660)
    for s, length, start_hz, end_hz, db, rasp in rows:
        part = slice(int(s * SR), int((s + length) * SR))
        along = np.linspace(0, 1, part.stop - part.start)
        hz = start_hz + (end_hz - start_hz) * along + rasp * rasp_hz * flutter[part]
        tone = np.sqrt(2) * np.sin(2 * np.pi * np.cumsum(hz) / SR)
        out[part] += from_db(db) * np.sin(np.pi * along) * tone
    return out


def strike(rows, modes, detune):
    """Modal superposition: each blow (t/s, level/dB, perhaps a favoured f/Hz) rings every mode."""
    out, age = np.zeros(N), T[:SR // 6]
    for s, db, *favoured in rows:
        start = int(s * SR)
        for hz, mode_db, t60 in modes:
            share = 1
            if favoured:
                share = np.exp(-(np.log2(hz / favoured[0]) / KNOCK_SPREAD_OCTAVES) ** 2)
            mode_hz = hz * (1 + detune * rng.standard_normal())
            ring = share * np.sin(2 * np.pi * mode_hz * age) * rng.choice([-1, 1])
            blow_db = db + mode_db + rng.normal(0, MODE_SCATTER_DB)
            blow = ring * from_db(blow_db - 60 * age / t60)
            out[start:start + len(age)] += blow[:N - start]
    return out


def decays(times, levels_db, t60, rise):
    """Addition of incoherent powers: blows swell quickly and decay exponentially; returns a gain."""
    power = np.zeros(N)
    for s, db in zip(times, levels_db):
        start = int(s * SR)
        age = T[:min(SR // 2, N - start)]
        blow = from_db(db - 60 * age / t60) * (1 - np.exp(-age / rise))
        power[start:start + len(age)] += blow ** 2
    return np.sqrt(power)


def swell(rows, far_db=-120):
    """Level against distance: sources (t/s, reach/s, level/dB) approach and recede over a far background."""
    power = sum(from_db(db) ** 2 / (1 + ((T - s) / reach) ** 2) ** FALLOFF for s, reach, db in rows)
    return 10 * np.log10(power + from_db(far_db) ** 2)


def swells(rows, far_dbs):
    """Level against distance, for each level column of a table."""
    return [swell([(s, reach, dbs[k]) for s, reach, *dbs in rows], far_db)
            for k, far_db in enumerate(far_dbs)]


def dip_db():
    """Gaussian attenuation: the level dips briefly."""
    return DIP_DB * np.exp(-((T - DIP_AT_S) / DIP_HALF_WIDTH_S) ** 2)


def chance_times(per_s, near_db):
    """Poisson-like chance: random moments, most frequent when a car is nearest."""
    return T[rng.random(N) < per_s * from_db(near_db - near_db.max()) / SR]


def street(colour, excite=1):
    """Spectral shaping: noise modulated by excite is coloured, direct in the middle and scattered aside."""
    above = np.minimum(colour[-1][0] / HZ, 1) ** 2   # falls on above the last point
    shape = gain_at(colour) * above
    shape = shape / np.sqrt(np.mean(shape ** 2))
    mid, side = rfft(rng.standard_normal((2, N)) * excite) * shape
    return spread(mid, side)


def spread(mid, side):
    """Mid-side stereophony: spectra of direct and scattered sound become left and right signals."""
    side = side * gain_at(WIDTH) * from_db(-0.5)
    lean = np.sqrt(gain_at(LEAN))   # half the difference on each side
    return irfft(np.array([(mid + side) * lean, (mid - side) / lean]), N)


def pan(x, left_db):
    """Interchannel level difference: place a sound to one side."""
    return x * from_db([[left_db / 2], [-left_db / 2]])


def drift(rate):
    """Low-pass filtered noise: random change slower than about rate (Hz), with spread 1."""
    return rms_one(irfft(rfft(rng.standard_normal(N)) / (1 + (HZ / rate) ** 2), N))


def gain_at(points):
    """Logarithmic interpolation: a table of f/Hz, level/dB as a gain at every frequency."""
    hz, db = np.transpose(points)
    return from_db(np.interp(np.log(HZ), np.log(hz), db))


def in_time(rows):
    """Linear interpolation: each column of a curve at every sample."""
    s, *columns = np.transpose(rows)
    return [np.interp(T, s, c) for c in columns]


def rms_one(x):
    """Power normalisation: scale to unit mean square."""
    return x / np.sqrt(np.mean(x ** 2) + 1e-20)


def from_db(db):
    """Decibel law: level to amplitude gain."""
    return 10 ** (np.asarray(db) / 20)


def scene():
    """Superposition: traffic in front, the train and the bird behind it."""
    roar_db, hiss_db, near_db = swells(PASSES, [FAR_ROAR_DB, FAR_HISS_DB, FAR_SIZZLE_DB])
    rolling = road(roar_db, hiss_db, near_db) + growl()
    blows = bumps(near_db, slap_t60=0.15, thud_t60=0.1, rattle_t60=0.091)
    loose = gravel() + clicks(near_db) + chinks()
    cars = rolling + fan() + blows + loose + engines() + squeaks() + puff()
    behind = train() + bird()
    return cars + behind


def record(dry):
    """Band limitation: the microphone drops the deepest bass and the very top."""
    bass_cut = signal.butter(2, 28, "high", fs=SR, output="sos")
    top_cut = signal.ellip(10, .1, 80, CUTOFF_HZ, fs=SR, output="sos")
    return signal.sosfilt(top_cut, signal.sosfilt(bass_cut, dry))


dry = scene()
out = record(dry)
inscribe(out)
```